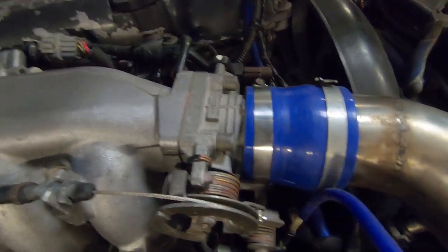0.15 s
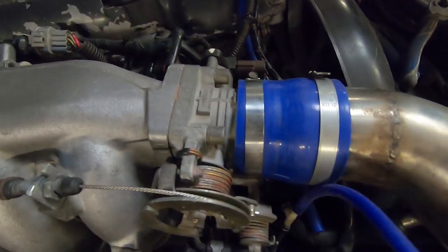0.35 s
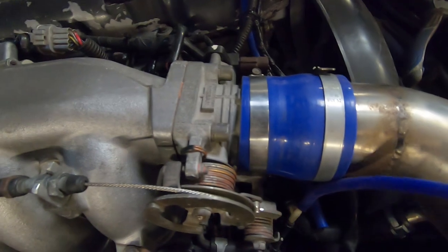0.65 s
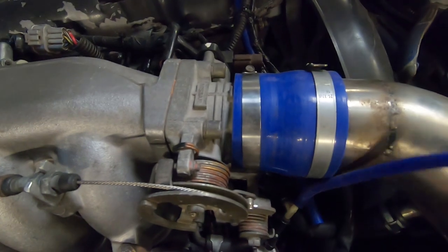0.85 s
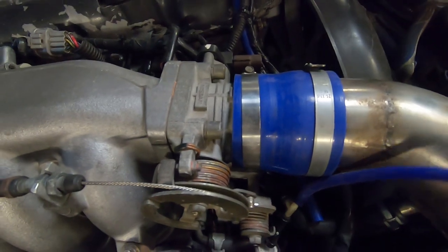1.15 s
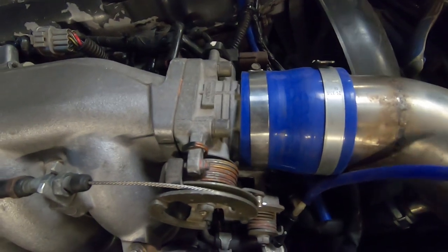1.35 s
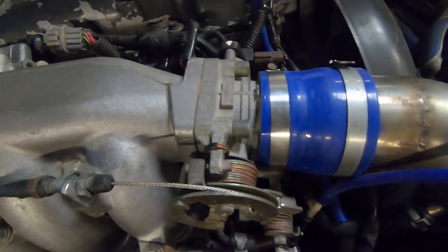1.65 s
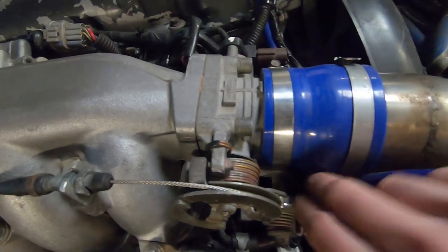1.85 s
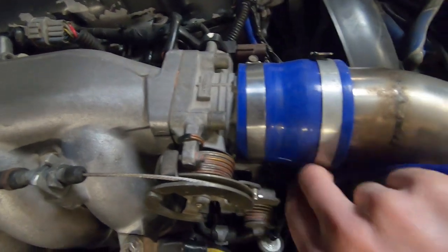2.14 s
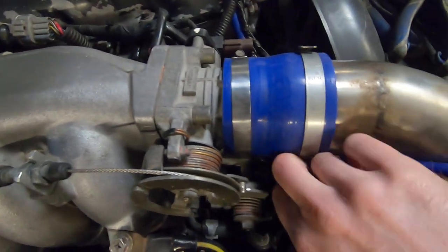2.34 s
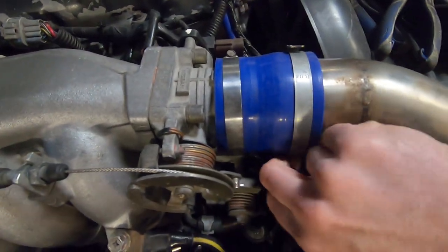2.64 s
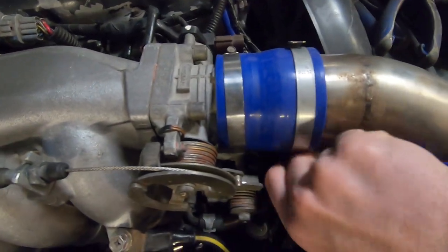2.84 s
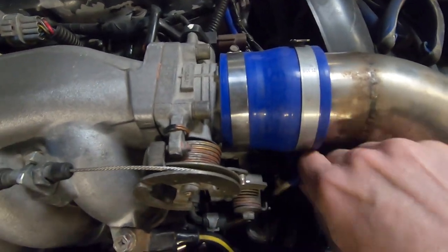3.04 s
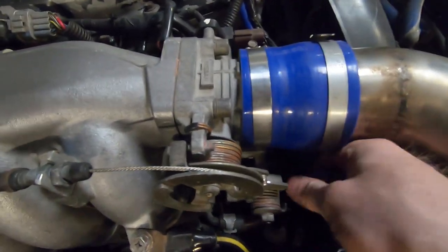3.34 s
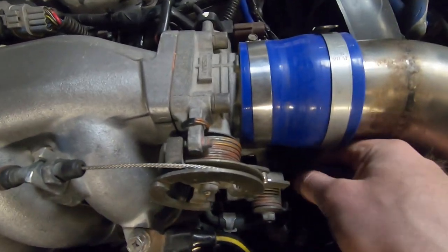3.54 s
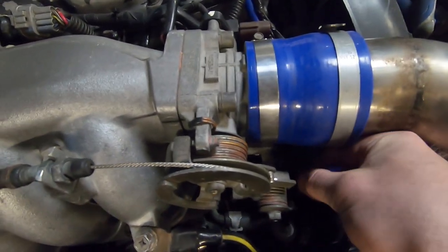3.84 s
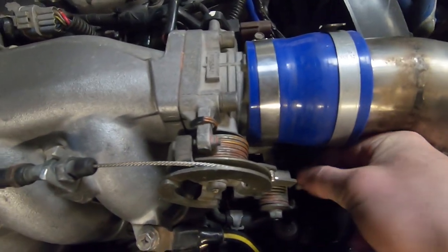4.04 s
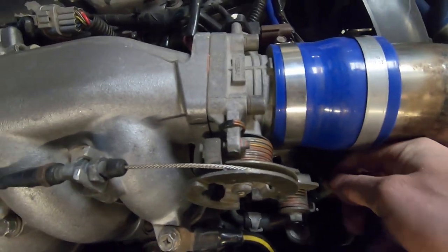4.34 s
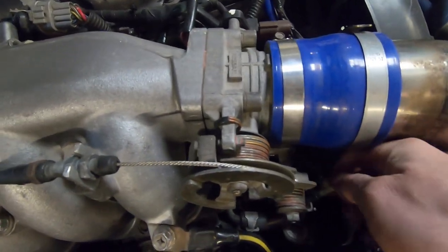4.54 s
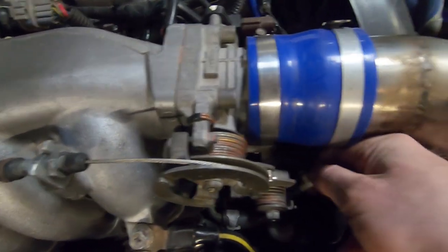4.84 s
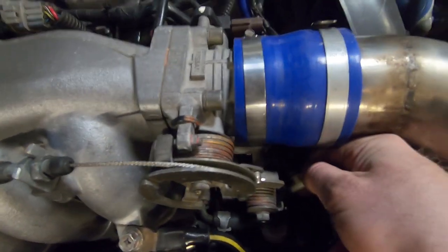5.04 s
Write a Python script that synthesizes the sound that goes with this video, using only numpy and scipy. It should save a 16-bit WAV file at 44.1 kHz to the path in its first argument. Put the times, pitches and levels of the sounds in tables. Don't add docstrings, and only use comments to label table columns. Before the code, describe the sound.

A hand-held stereo camera hears compressed air leaking from car intake piping at close range. First comes a loud open rush with a short howl, then a narrow airy whistle, strongest early and gently weaker later. Pipe-coloured hiss flickers around it. Dull handling taps, low bumps and rubbing creaks intrude, clustered between three and four seconds. No engine runs.

```python
import sys
import numpy as np
from scipy import signal
from scipy.io import wavfile
from scipy.ndimage import uniform_filter1d

SR = 44100
rng = np.random.default_rng(int(sys.argv[2]) if len(sys.argv) > 2 else 0)


def makeup_ratio(level_db):
    decades = np.asarray(level_db, float) / 20
    return 10 ** decades


def waveform_to_disk(signal):
    frames = np.transpose(np.atleast_2d(signal))
    scaled = np.clip(frames, -1, 1) * 32767
    samples = np.round(scaled).astype(np.int16)
    wavfile.write(sys.argv[1], SR, samples)


N = 228886
FRAME, HOP = 1024, 256
HZ = np.fft.rfftfreq(FRAME, 1 / SR)
FRAME_S = np.arange(N // HOP + 5) * HOP / SR
T = np.arange(N) / SR


def evened(x):
    mean_power = np.mean(np.mean(np.atleast_2d(x), 0) ** 2)
    return x / np.sqrt(mean_power + 1e-20)


def read(points, hz):
    f, *columns = np.transpose(points)
    return [np.interp(np.log(hz + 1), np.log(f + 1), c)[:, None] for c in columns]


def follow(rows, t):
    s, *columns = np.transpose(rows)
    return [np.interp(t, s, c) for c in columns]


def add(mix, s, sound):
    part = mix[:, round(s * SR):][:, :sound.shape[1]]
    part += sound[:, :part.shape[1]]


def blur(shape, bins, frames):
    field = uniform_filter1d(rng.standard_normal(shape), bins, -2)
    field = uniform_filter1d(field, frames, -1)
    return field / field.std()


def coloured(points):
    inside = (HZ >= points[0][0]) & (HZ <= points[-1][0])
    return makeup_ratio(read(points, HZ)[0]) * inside[:, None]


def humps(modes):
    return [(1 / (1 + (2 * (HZ[:, None] - hz) / width) ** 2), db) for hz, width, db in modes]


def panned(x, pan_db):
    return x * makeup_ratio(np.outer([.5, -.5], pan_db))


def air(magnitude, patchy_db, ripple_db, flicker_db):
    # (frequency [Hz], left-right likeness [0-1], right lead [rad], left-right balance [dB])
    ports = [(100, 0.87, 1, 0), (517, 0.96, 0.5, -1), (774, 0.11, 0.5, -5), (1510, 0.32, -2, -1),
             (3590, 0.42, -0.5, 0.5), (4680, 0.35, 2, 2.5), (6460, 0.81, 3.5, -5), (7130, 0.87, 4, 0.5),
             (8330, 0.36, 3, -2), (10520, 0.63, 9.5, 3), (13500, 0.8, 4, 0.5), (16000, 0, 10, 3)]
    same, lead, tilt_db = read(ports, HZ)
    same = np.clip(same, 0, 1)
    shape = (len(HZ), len(FRAME_S))
    a, b, c, d = rng.standard_normal((4, *shape))
    left = a + 1j * b
    unlike = c + 1j * d
    right = (same * left + np.sqrt(1 - same ** 2) * unlike) * np.exp(1j * lead)
    z = np.array([left * makeup_ratio(tilt_db / 2), right * makeup_ratio(-tilt_db / 2)]) * magnitude
    patches = patchy_db * blur(shape, bins=12, frames=12)
    puffs = flicker_db * blur(shape, bins=200, frames=3)
    ripples = ripple_db * blur((2, *shape), bins=2, frames=90)
    z *= makeup_ratio(patches + puffs + ripples)
    return evened(signal.istft(z, nperseg=FRAME, noverlap=FRAME - HOP)[1][:, :N])


def thump(db, hz):
    t = np.arange(6000) / SR
    swell = 1 - np.exp(-t / .004)
    decay = makeup_ratio(-60 * t / 0.099)
    push = swell * decay * np.sin(2 * np.pi * hz * t)
    return makeup_ratio(db) * np.array([0.43 * push, 0.46 * push]) / abs(push).max()


def knock(db, bright_db, blow_s, slips):
    # (frequency [Hz], t60 [s], left level [dB], right level [dB], right lead [rad])
    shell_modes = [(163, 0.13, -25, -18.5, 0.5), (490, 0.042, 0.5, 6, 0.3), (759, 0.031, -4, 6, 1.5),
                   (984, 0.028, -0.5, 5, 1.5), (1298, 0.032, -9, -1.5, 1.5), (1646, 0.018, -9, -3.5, 3.5),
                   (2300, 0.0092, -20, -14, 4), (3280, 0.0055, -20, -12.5, 1)]
    t = np.arange(3000) / SR
    blow = np.zeros(len(t))
    slip_at = (np.linspace(0, blow_s, len(slips)) * SR).astype(int)
    np.add.at(blow, slip_at, np.sign(slips) * (0.57 + abs(slips)))
    ring = np.zeros((2, len(t)))
    for hz, t60, left_db, right_db, lead in shell_modes:
        colour_db = np.array([[left_db], [right_db]]) + bright_db * np.log2(hz / 490)
        phase = 2 * np.pi * hz * t + np.array([[0], [lead]])
        onset = np.minimum(t * hz * 4, 1)
        ring += makeup_ratio(colour_db - 60 * t / t60) * np.sin(phase) * onset
    ring = signal.fftconvolve(ring, blow[None], axes=1)[:, :len(t)]
    return makeup_ratio(db) * ring / abs(ring.mean(0)).max()


def handling():
    # (time [s], sway [dB], grip rumble [dB], creak [dB])
    rub = [(0.0, -74, -63, -64), (0.07, -88, -69, -60), (0.24, -82, -72, -70), (0.33, -92, -73.5, -75),
           (0.43, -91, -81, -72), (0.49, -105, -81, -75), (0.59, -95, -71, -61.5), (0.82, -111, -80, -75),
           (0.97, -83, -74, -70), (1.05, -100, -78, -71), (1.31, -89, -73, -73), (1.36, -96, -68, -59),
           (1.46, -78, -73, -54), (1.53, -78, -66, -55.5), (1.65, -85, -66, -54.5), (1.82, -90, -70, -58),
           (1.91, -90, -71, -74), (1.95, -65, -68, -77), (1.97, -68, -65, -73), (2.04, -94, -62, -74),
           (2.12, -90, -66.5, -74), (2.18, -77, -68, -70), (2.23, -88, -61, -64), (2.3, -87, -69, -73),
           (2.36, -72, -57, -59), (2.44, -66, -68, -63), (2.53, -75, -65, -69.5), (2.62, -94, -71, -71),
           (2.64, -87, -73, -56.5), (2.78, -93, -70.5, -66.5), (3.06, -90, -71, -60),
           (3.11, -77, -73, -59.5), (3.15, -60, -74, -53), (3.21, -58, -68, -63), (3.24, -61, -53, -60),
           (3.29, -77, -60, -58), (3.4, -87, -66, -63), (3.44, -76, -73, -59), (3.54, -82, -51, -57),
           (3.7, -92, -74, -60), (3.74, -84, -70, -52), (3.79, -66, -67, -50), (3.8, -60, -58, -51),
           (3.86, -79, -64, -58), (4.05, -95, -74, -82), (4.1, -89, -78, -85), (4.32, -92, -76, -64),
           (4.41, -77, -76, -57), (4.48, -91, -73, -66.5), (4.61, -86, -75, -66), (4.88, -90, -73, -60),
           (5.03, -87, -72, -88), (5.07, -95.5, -73, -65), (5.15, -91, -79, -72.5), (5.19, -99, -77, -71)]
    # (frequency [Hz], density [dB per Hz])
    sway = [(20, -25), (40, -16), (65, -2), (90, 2), (115, -6), (150, -38)]
    rumble = [(68, -49), (115, -24), (133, -13.5), (162, 8.5), (180, -2.5), (200, -6), (330, -13),
              (430, -46), (730, -120)]
    creak = [(150, -41), (250, -11.5), (323, -4), (361, -8.5), (460, -3), (532, -12.5), (614, -13.5),
             (748, -7), (966, -1), (1200, -15), (1560, -39), (2640, -120)]
    # (time [s], peak [dB], brightness [dB per octave], length of the blow [s])
    knocks = [(1.444, -21.5, -3.5, 0.0044), (1.472, -30, -3.5, 0.0049), (1.608, -38, 1.5, 0.0026),
              (1.666, -43, 8.5, 0.005), (1.791, -44, 3, 0.007), (2.331, -45.5, 9, 0.0087),
              (2.396, -45.5, -3, 0.0045), (2.992, -42.5, -5, 0.006), (3.057, -42, -6, 0.0057),
              (3.093, -39, 2.5, 0.0071), (3.146, -28, 3.2, 0.0056), (3.207, -31.5, 4.5, 0.0065),
              (3.339, -31.5, -1, 0.0044), (3.358, -41.5, -4, 0.0047), (3.433, -25, 4.5, 0.0042),
              (3.48, -47.5, 2, 0.0069), (3.505, -35, -17, 0.0037), (3.559, -39.5, 9, 0.0072),
              (3.574, -34, 4, 0.0089), (3.631, -43, 2, 0.006), (3.747, -39, 0.1, 0.0048),
              (3.776, -36, 3, 0.0071), (3.797, -40, -7, 0.0041), (4.272, -45, 7, 0.0064),
              (4.37, -32, 0.1, 0.0076), (4.708, -52, -5, 0.0078), (4.759, -37, -0.5, 0.0042),
              (4.966, -49.5, -1.3, 0.0078)]
    # (time [s], peak [dB], frequency [Hz])
    thumps = [(0.227, -44.5, 202), (1.448, -44, 172), (1.95, -37, 180), (2.327, -52, 250),
              (2.409, -42.5, 182), (2.47, -49, 193), (3.151, -40, 145), (3.209, -44, 153),
              (3.74, -35.5, 161), (4.363, -49, 240), (4.756, -53.5, 177)]
    sway_db, rumble_db, creak_db = follow(rub, T)
    out = makeup_ratio(sway_db) * air(coloured(sway), patchy_db=.6, ripple_db=.6, flicker_db=1.5)
    out += makeup_ratio(rumble_db) * air(coloured(rumble), patchy_db=1.5, ripple_db=.6, flicker_db=2.2)
    out += makeup_ratio(creak_db) * air(coloured(creak), patchy_db=2.2, ripple_db=.6, flicker_db=2.3)
    for s, *blow in knocks:
        add(out, s - .002, knock(*blow, slips=rng.standard_normal(5)))
    for s, *push in thumps:
        add(out, s, thump(*push))
    return out


def gush():
    # (time [s], level [dB])
    gush_level = [
        (0, -35.5),
        (.06, -35.5),
        (.12, -39.5),
        (.16, -42),
        (.2, -44.5),
        (.24, -37),
    ]
    # (frequency [Hz], density [dB per Hz])
    gush_colour = [(1470, -33), (2500, 1), (3030, -18), (3430, 0), (3720, -14), (4730, -5), (5230, 0),
                   (6260, 2), (7970, 5.5), (9250, -10), (11000, -11), (14300, -43), (22000, -120)]
    # (frequency [Hz], width [Hz], level [dB])
    howl_modes = [(2654, 110, -10), (3222, 94, 4), (3800, 150, -10), (4220, 140, -8), (4530, 230, -5.5),
                  (4920, 170, -4)]
    # (time [s], level [dB])
    howl_level = [
        (.04, -62),
        (.12, -44),
        (.17, -35),
        (.21, -31.5),
        (.236, -32.5),
        (.242, -65),
    ]
    stop = np.clip((.242 - T) / 0.0055, 0, 1)
    wide = air(coloured(gush_colour), patchy_db=1.7, ripple_db=1.3, flicker_db=0.87)
    howl_peaks = sum(makeup_ratio(db) * hump for hump, db in humps(howl_modes))
    howl = air(howl_peaks, patchy_db=.6, ripple_db=.6, flicker_db=0.54)
    both = makeup_ratio(follow(gush_level, T)[0]) * wide + makeup_ratio(follow(howl_level, T)[0]) * howl
    return panned(both, -4.5) * stop


def jet():
    # (time [s], low roar [dB], middle hiss [dB], top fizz [dB], left-right balance [dB])
    jet_levels = [(0.0, -47.5, -41.5, -46, -5.5), (0.1, -51.5, -39, -49.5, -9),
                  (0.26, -58.5, -42, -52, -6.0), (0.3, -56, -43, -50, -6), (0.45, -66.5, -46, -52, -4.5),
                  (0.55, -58, -42, -47, -5.5), (0.69, -56, -47, -56, -3.5), (0.74, -62, -48, -51.5, -5),
                  (0.87, -61, -44, -54.5, -6.5), (0.98, -58.5, -49.5, -46.5, -6),
                  (1.05, -57, -46, -53, -7.5), (1.19, -58.5, -46.5, -48, -6), (1.26, -53.5, -57, -46, -2),
                  (1.65, -56.5, -48.5, -50, -6), (1.91, -62, -52, -52, -2), (2.11, -60, -53.5, -53.5, -5.5),
                  (2.24, -58.5, -49, -51.5, -3), (2.5, -61.5, -49, -50.5, -4), (2.6, -57.5, -48, -56, -5),
                  (2.78, -59, -49.5, -55, -6.5), (2.95, -57, -50, -57.5, -5), (3.15, -57.5, -51, -52, -5.5),
                  (3.21, -55.5, -49, -57, -4.5), (3.47, -56, -55, -52.5, -5),
                  (3.61, -55.5, -52.5, -57.5, -4.5), (3.66, -60.5, -52, -52.5, -8),
                  (3.95, -60, -52.5, -56, -4.5), (3.96, -62, -49.5, -59, -6), (4.08, -59, -54.5, -57.5, -6),
                  (4.65, -63, -52.5, -57.5, -4), (4.93, -60.5, -54, -57.5, -5.5),
                  (5.19, -63, -56.5, -61.5, -4.5)]
    # (frequency [Hz], density [dB per Hz])
    roar_colour = [(180, -59), (300, -16), (676, -9.5), (1000, -9), (1190, -2.5), (1510, -1.5), (1840, 0),
                   (2800, -4), (3640, -31), (6160, -120)]
    hiss_colour = [(1180, -24), (2000, -7), (2130, -4), (2370, -8.5), (2980, -2), (3240, -1.5), (4010, 0.5),
                   (5220, -3.5), (6040, -2.5), (6400, -1), (8320, -32), (14100, -120)]
    fizz_colour = [(5060, -34), (8600, -5.5), (9400, -9.5), (10200, -2.5), (11200, -11.5), (13800, -20),
                   (15100, -11), (15800, -20)]
    # (frequency [Hz], width [Hz], boost [dB])
    pipe_modes = [(938, 140, 6), (1515, 130, 1.5), (2088, 60, 3), (2560, 60, 5), (3184, 52, 4),
                  (3610, 140, 4.5), (4028, 96, 2.5), (4860, 74, 6.5), (5500, 80, 0)]
    roar_db, hiss_db, fizz_db, pan_db = follow(jet_levels, T)
    pipe = makeup_ratio(sum(db * hump for hump, db in humps(pipe_modes)))
    roar = air(coloured(roar_colour) * pipe, patchy_db=1.6, ripple_db=1.86, flicker_db=0.94)
    hiss = air(coloured(hiss_colour) * pipe, patchy_db=2.34, ripple_db=4.9, flicker_db=0.43)
    fizz = air(coloured(fizz_colour), patchy_db=1.9, ripple_db=1.5, flicker_db=1.8)
    return panned(makeup_ratio(roar_db) * roar + makeup_ratio(hiss_db) * hiss + makeup_ratio(fizz_db) * fizz, pan_db)


def whistle():
    # (time [s], level [dB], centre [Hz], left-right balance [dB])
    slit = [(0.22, -39, 6800, -8.0), (0.23, -35.5, 6880, -6), (0.33, -31, 7300, -7),
            (0.45, -34, 7580, -5.0), (0.55, -33.5, 7400, -4.5), (0.61, -38.5, 7170, -5.5),
            (0.7, -38, 7500, -5.5), (0.83, -37, 7330, -6.5), (0.86, -41, 7300, -8),
            (1.08, -41.5, 7370, -1.5), (1.15, -45, 7320, -5.5), (1.19, -41, 7600, -6),
            (1.23, -42, 7540, -2.5), (1.26, -37, 7500, -4), (1.28, -39.5, 7500, -2),
            (1.34, -38.5, 7300, -3), (1.45, -41.5, 7500, -2.5), (1.51, -38, 7530, -3),
            (1.89, -43.5, 7540, -3.5), (1.92, -41, 7700, -2), (1.99, -41.5, 7630, -2.5),
            (2.21, -43.5, 7700, -2), (2.36, -40.5, 7770, 2), (2.66, -40, 7730, 0), (2.71, -42.5, 7600, -5),
            (2.77, -39.5, 7670, 1.5), (2.82, -44.5, 7700, -0.5), (2.89, -40.5, 7700, -1.5),
            (3.06, -40.5, 7660, 0.5), (3.17, -38.5, 7670, -4.5), (3.22, -43, 7570, -3),
            (3.24, -39, 7700, 1), (3.31, -42.5, 7560, -5), (3.35, -43, 7570, -3.5), (3.5, -40, 7600, -1.5),
            (3.72, -41.5, 7600, -1), (3.78, -40, 7580, -1.5), (3.9, -39.5, 7660, -3.5),
            (3.94, -47, 7580, 0), (3.97, -43, 7580, -5.5), (4.1, -41.5, 7520, 2), (4.15, -41.5, 7500, -8.5),
            (4.21, -40.5, 7680, 0), (4.32, -45, 7540, -7.5), (4.34, -38, 7530, -3.5),
            (4.47, -42.5, 7600, -0.5), (4.5, -40, 7520, 0), (4.7, -45.5, 7570, -1), (4.73, -39.5, 7560, -6),
            (4.77, -44.5, 7540, -2.5), (4.97, -41.5, 7550, -3.5), (5.15, -42.5, 7430, -6.5),
            (5.19, -46, 7600, -5)]
    # (time [s], lower skirt [kHz], upper skirt [kHz]), both at 10 dB down
    skirts = [(.22, 0.72, 0.78), (.4, 0.68, 0.67), (.55, 1.06, 0.6), (.7, 0.87, 0.73), (1.0, 0.66, 0.88),
              (1.3, 1.02, .7), (1.7, 0.81, 0.84), (2.0, 0.81, 0.55), (2.5, 0.69, 0.45), (3.0, 0.59, .5),
              (3.5, 0.58, 0.52), (4.0, 0.41, 0.5), (4.6, 0.49, 0.54), (5.19, 0.37, 0.43)]
    hz = follow(slit, FRAME_S)[1]
    below, above = follow(skirts, FRAME_S)
    off_khz = (HZ[:, None] - hz) / 1e3
    skirt_khz = np.maximum(np.where(off_khz > 0, above, below), .1)
    peak = (1 + 1.7 * (off_khz / skirt_khz) ** 2) ** -1.05
    peak = peak / np.sqrt((peak ** 2).mean(0))
    octave_db = -31.5
    octave = makeup_ratio(octave_db) * 1.8 / (1 + ((HZ[:, None] - 2 * hz) / 650) ** 2)
    level_db, _, pan_db = follow(slit, T)
    start = np.clip((T - slit[0][0]) / 0.011, 0, 1)
    tone = air(peak + octave, patchy_db=1.0, ripple_db=2.55, flicker_db=1.0)
    return panned(tone, pan_db) * makeup_ratio(level_db) * start


def scene():
    return handling() + gush() + jet() + whistle()


def roll_off(x):
    return signal.sosfilt(signal.butter(12, 15780, fs=SR, output="sos"), x)


def record(dry):
    return roll_off(dry)


dry = scene()
out = record(dry)
waveform_to_disk(out)
```